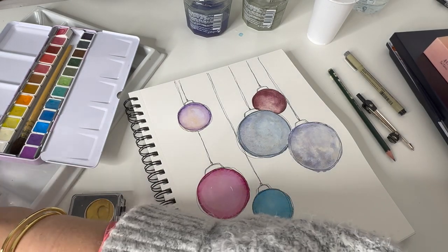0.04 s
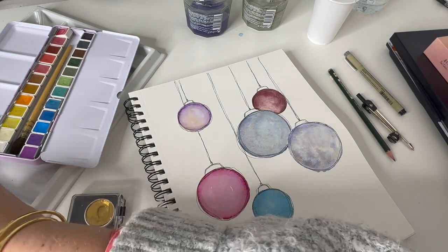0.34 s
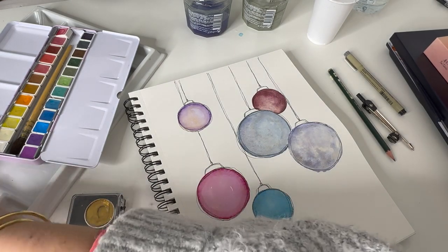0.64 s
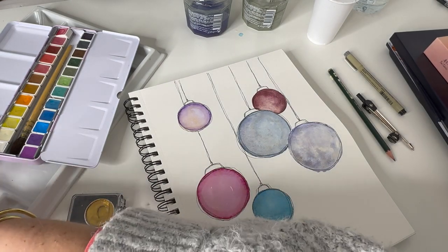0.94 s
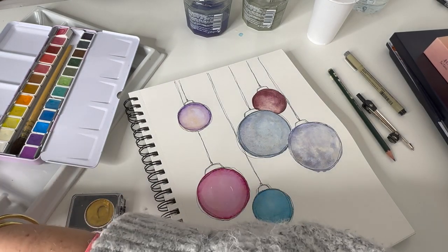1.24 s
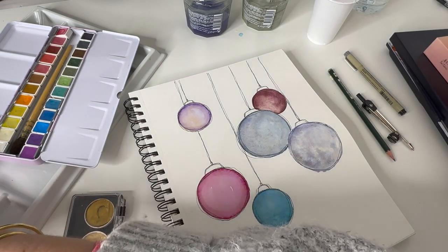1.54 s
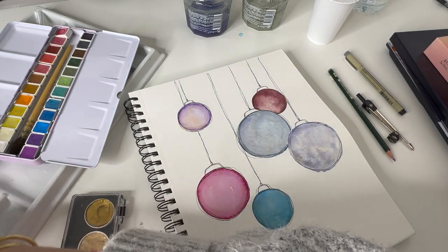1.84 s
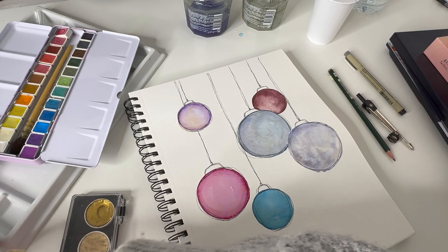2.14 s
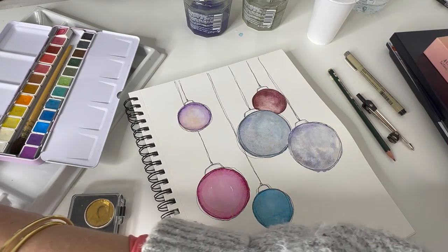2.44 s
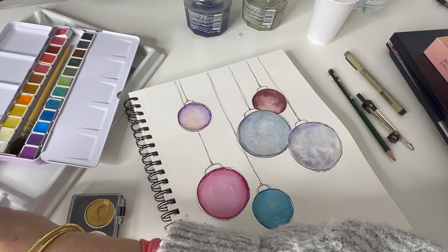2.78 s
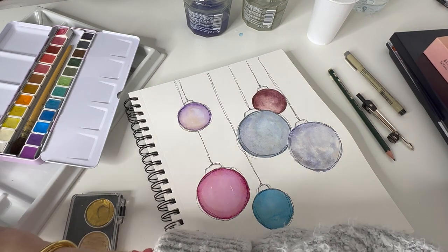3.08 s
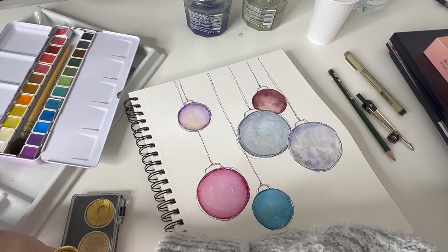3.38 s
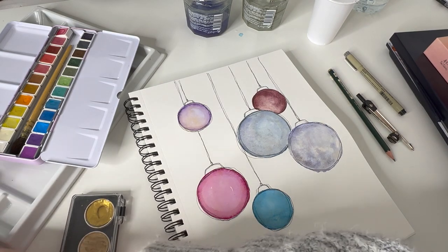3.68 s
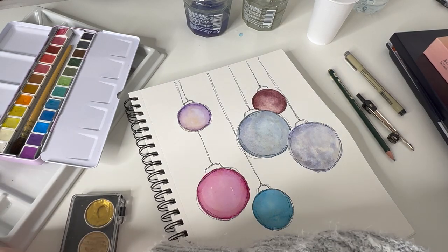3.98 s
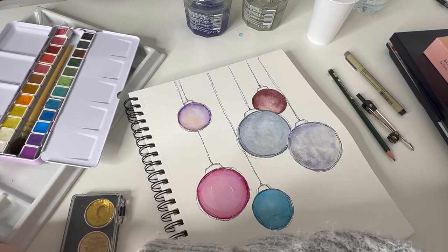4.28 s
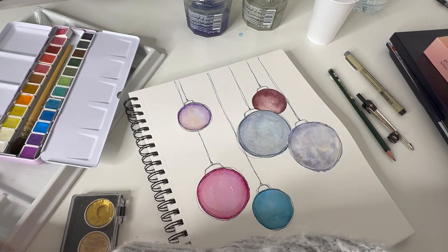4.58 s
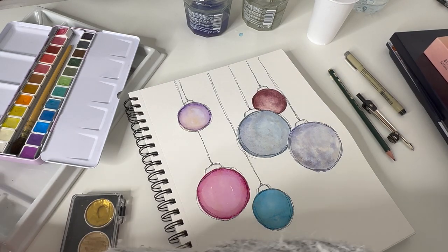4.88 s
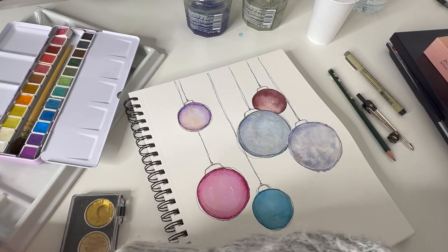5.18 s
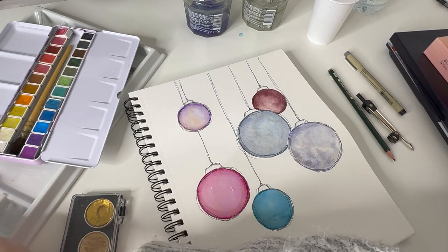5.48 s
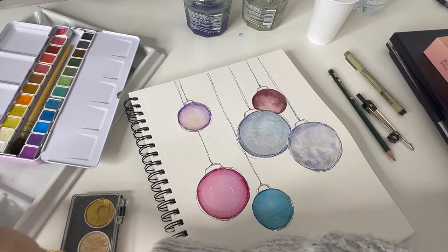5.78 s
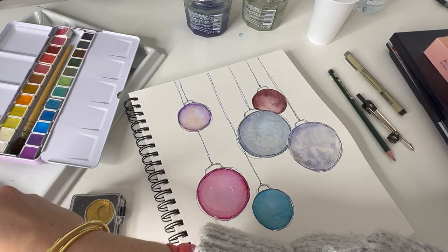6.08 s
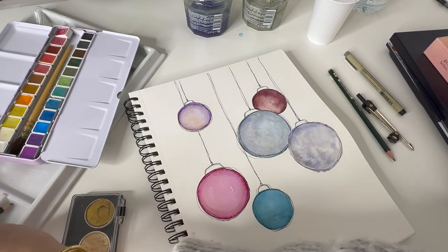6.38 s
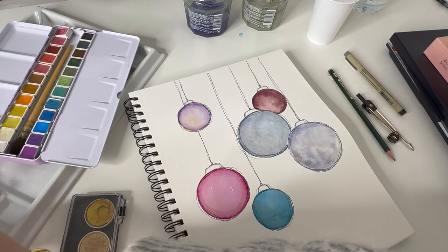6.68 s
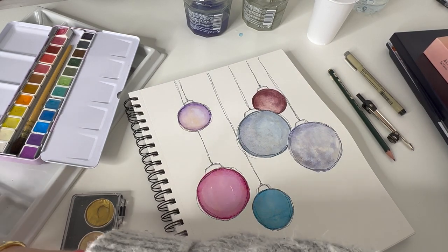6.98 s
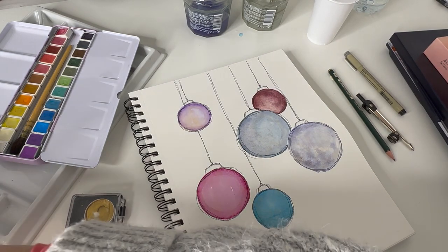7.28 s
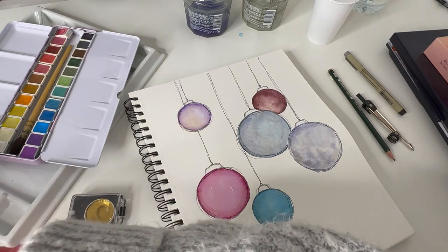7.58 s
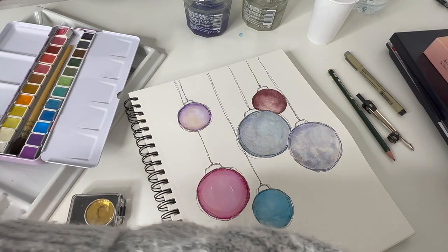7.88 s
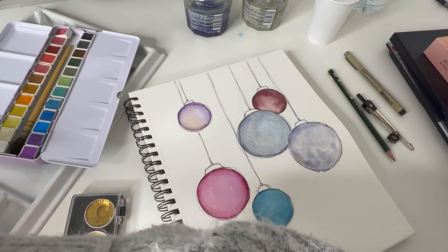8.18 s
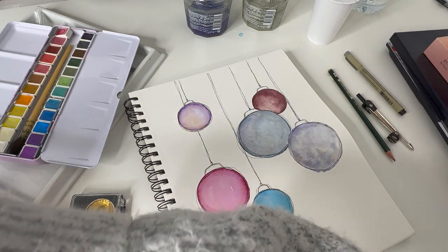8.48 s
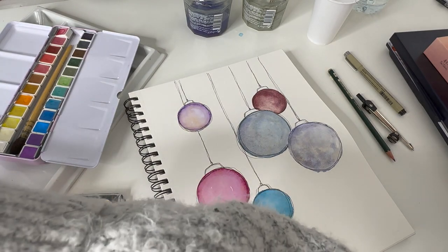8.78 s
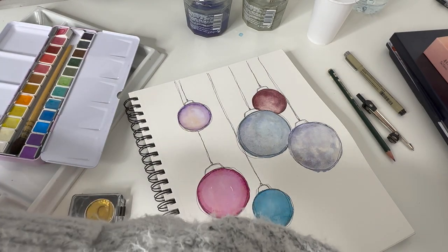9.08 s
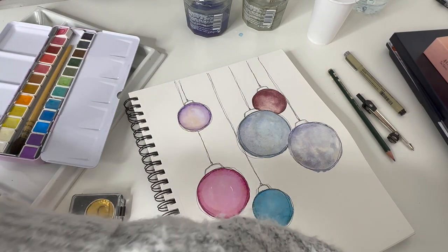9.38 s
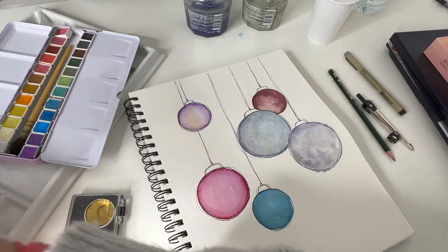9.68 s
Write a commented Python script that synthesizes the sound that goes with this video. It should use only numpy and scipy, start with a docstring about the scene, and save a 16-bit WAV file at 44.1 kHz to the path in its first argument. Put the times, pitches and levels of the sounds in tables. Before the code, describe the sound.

Light, uneven clatter of pens and brushes being shoved around a tray comes from left of the microphone, with a short slide of a box and dull bumps on the desk. After about six seconds, a wool sleeve takes over much closer, rustling in repeated strokes with dry crackles and quick bangle clicks. The room is small and still, apart from a low motor hum.

```python
"""A small quiet room, where someone sorts through painting things at a desk.
Brushes and pens knock, rattle and scrape in a tray off to the left, a box slides aside, the desk thuds.
Then a knitted sleeve sweeps close past the microphone: the wool rubs, its fibres catch and crackle,
and bangles click as they touch. An appliance motor hums underneath."""
import sys
import numpy as np
from scipy import signal
from scipy.fft import rfft, irfft, next_fast_len
from scipy.io import wavfile

SR = 44100
rng = np.random.default_rng(int(sys.argv[2]) if len(sys.argv) > 2 else 0)


def wav_out(sig):
    """Save sig, one row per channel (or a flat mono array), as 16-bit PCM at SR to the path in sys.argv[1]."""
    wavfile.write(sys.argv[1], SR, np.round(np.clip(np.atleast_2d(sig).T, -1, 1) * 32767).astype(np.int16))


N = 433944
TIME = np.arange(N) / SR
CUTOFF_HZ = 16100   # the microphone's upper limit
REBOUND_S, REBOUND_LOSS_DB = 0.009, 9   # typical gap between bounces, and the loss with each


def from_db(db):
    """Turn decibels into a gain to multiply by."""
    return np.exp(np.asarray(db) * np.log(10) / 20)


def rms_one(x):
    """Scale a signal so that its average level (rms) is 1."""
    return x / np.sqrt(np.mean(x ** 2) + 1e-20)


def at_hz(points, hz):
    """Read between the rows of a table, on a logarithmic frequency scale."""
    f, value = np.transpose(points)
    return np.interp(np.log(hz + 1), np.log(f), value)


def butter(x, hz, kind):
    """A gentle filter that keeps the lows, the highs or one band."""
    return signal.sosfilt(signal.butter(2, hz, kind, fs=SR, output="sos"), x + 1e-18)


def convolve(x, response):
    """Let every sample of a signal set off a copy of the response."""
    return signal.oaconvolve(x, response)[:len(x)]


def colour(x, points, size=4096):
    """Shape the tone from rows of frequency in Hz and level in dB; white noise keeps its power."""
    log_gain = np.log(from_db(at_hz(points, np.fft.rfftfreq(size, 1 / SR))))
    cepstrum = irfft(log_gain)
    cepstrum[1:size // 2] *= 2   # folded so that the filter rings only after a hit
    cepstrum[size // 2:] = 0
    response = irfft(np.exp(rfft(cepstrum)))
    return convolve(x, response / np.linalg.norm(response))


def drift(rate, size=16):
    """A smooth random wobble, about 1 in size, that finds a new value `rate` times a second."""
    knots = rng.standard_normal(int(TIME[-1] * rate) + 2)
    step, part = np.divmod(TIME[::size] * rate, 1)
    eased = step + np.sin(part * np.pi / 2) ** 2
    return np.repeat(np.interp(eased, np.arange(len(knots)), knots), size)[:N]


def add(track, s, sound):
    """Mix a short sound into a track at s seconds."""
    start = max(round(s * SR), 0)
    track[start:start + len(sound)] += sound[:N - start]


def grains(per_s, spread_db, clump_db, clump_rate):
    """Rubbing surfaces move in tiny slips of uneven size that come in clumps."""
    sizes = from_db(spread_db * np.minimum(rng.exponential(1, N), 5)) * rng.standard_normal(N)
    slipping = rng.random(N) < per_s / SR
    return rms_one(sizes * slipping * from_db(clump_db * drift(clump_rate)))


def contact(snap_s, chatter_s, chatter_db, size=3000):
    """A hard touch: a brief snap, then a dying chatter of small bounces."""
    t = TIME[:size]
    snap = rng.standard_normal(size) * t * np.exp(-t / snap_s)
    chatter = rng.standard_normal(size) ** 3 * np.exp(-t / chatter_s) * (1 - np.exp(-t / snap_s))
    touch = snap / np.linalg.norm(snap) + from_db(chatter_db) * chatter / np.linalg.norm(chatter)
    return touch / np.linalg.norm(touch)


def ticks(per_s):
    """Now and then something catches and lets go with a tiny tick."""
    catches = grains(per_s, spread_db=2, clump_db=2, clump_rate=10)
    return convolve(catches, contact(snap_s=.0005, chatter_s=.004, chatter_db=-10))


def push(start_s, length_s, attack_s, sag_db_per_s, stop_db_per_s):
    """The strength of one push: it builds up, sags while it lasts, then dies away."""
    t = np.maximum(TIME - start_s, 0)
    lost_db = sag_db_per_s * np.minimum(t, length_s) + stop_db_per_s * np.maximum(t - length_s, 0)
    return np.minimum(t / attack_s, 1) * from_db(-np.minimum(lost_db, 200))


def room_response(build_s=0.00032, size=22050):
    """The room's echoes build up quickly and die away, the high ones first."""
    # Each row: frequency in Hz, seconds to fade by 60 dB.
    fade_times = [(100, 0.48), (500, 0.3), (2500, 0.24), (6000, 0.21), (15000, 0.022)]
    t, edges = TIME[:size], np.geomspace(60, 18000, 10)
    tail = np.zeros(size)
    for low, high in zip(edges, edges[1:]):
        fade = 1000. ** (-t / at_hz(fade_times, np.sqrt(low * high)))
        tail += butter(rng.standard_normal(size), [low, high], "band") * fade
    tail *= 1 - np.exp(-t / build_s)
    return tail / np.linalg.norm(tail)


def place(x, lead_ms, pan_db, room_db, moves_per_s=6):
    """Sound from the left reaches the left side first and louder; its echoes shift as things move."""
    delayed = np.roll(x, round(lead_ms * SR / 1000))
    direct = np.array([x * from_db(pan_db / 2), delayed * from_db(-pan_db / 2)])
    turn = drift(moves_per_s)
    spots = x * np.cos(turn), x * np.sin(turn)
    room = [sum(convolve(spot, room_response()) for spot in spots) for side in range(2)]
    return direct + from_db(room_db) * np.array(room)


def background(air_db, apart_db):
    """An appliance hums over soft room noise; its two lowest motor tones are so close that they throb."""
    # The motor's tones. Each row: pitch in Hz, level in dB.
    tones = [(52.2, -67), (56.5, -57), (193, -69.5)]
    # The room's noise. Each row: frequency in Hz, relative level in dB.
    air_colour = [(25, -35), (66, -3), (100, -15), (132, -10), (195, -17), (600, -34), (1940, -42),
                  (2350, -38), (2760, -46), (8400, -58), (16000, -62)]
    hum = np.zeros(N)
    for hz, db in tones:
        level = from_db(db + 2 * drift(7.7)) * np.sqrt(2)
        hum += level * np.sin(2 * np.pi * hz * TIME + .5 * drift(2.5))
    air = colour(rng.standard_normal(N), air_colour)
    scale = from_db(air_db) / np.std(butter(air, 51, "high"))
    # A second noise, added on the left and taken away on the right, makes the air sound wide.
    apart = from_db(apart_db) * butter(colour(rng.standard_normal(N), air_colour), 210, "high")
    return (hum + scale * air) * from_db([[-1], [.8]]) + scale * apart * [[1], [-1]]


def desk(level_db, fade_s, thud_db, size=8000):
    """A soft bump makes the desk top ring with one low tone and a hollow thud around it."""
    # Each row: start in seconds, relative level in dB, pitch in Hz.
    bumps = [(0.156, -45, 421), (0.759, -37.5, 477), (2.017, -38.5, 153), (2.28, -37, 463),
             (2.296, -28.5, 142), (4.894, -35.5, 364), (4.955, -29.5, 350), (4.961, -34, 134),
             (4.983, -33, 65), (6.208, -35, 450), (6.792, -32, 492), (6.855, -37.5, 402), (7.028, -37, 353),
             (7.626, -34.5, 127), (7.644, -32.5, 290), (7.666, -38, 74.5), (8.404, -37, 341),
             (9.576, -36, 275), (9.629, -41.5, 141)]
    out, t = np.zeros(N), TIME[:size]
    envelope = 1000. ** (-t / fade_s) * (1 - np.exp(-t / 0.00038))
    for s, db, hz in bumps:
        thud = rms_one(butter(rng.standard_normal(size), [.55 * hz, 1.57 * hz], "band"))
        tone = np.sin(2 * np.pi * hz * t)
        add(out, s, from_db(db + level_db) * envelope * (tone + from_db(thud_db) * thud))
    return out


def slide():
    """A box slides over the desk with smooth, fine friction, first lightly, then firmly."""
    # Each row: start in seconds, length in seconds, level in dB.
    slides = [(1.453, 0.057, -51), (1.71, 0.15, -45.5)]
    # The friction's tone. Each row: frequency in Hz, relative level in dB.
    slide_colour = [(100, -33), (400, -5), (690, -3), (860, -7.5), (1250, 5), (2500, -5), (4500, -12),
                    (9000, -22.5), (16000, -26)]
    speed = sum(from_db(db) * push(s, length_s, attack_s=0.088, sag_db_per_s=0, stop_db_per_s=339)
                for s, length_s, db in slides)
    return speed * colour(rng.standard_normal(N), slide_colour)


def pings(fade_s, size=16000):
    """A bangle or pen barrel swings free and rings with a thin, clean tone."""
    # Each row: start in seconds, level in dB, pitch in Hz.
    tones = [(0.227, -60.5, 5970), (0.227, -60, 3520), (4.051, -32, 5650), (4.052, -34, 2000),
             (4.071, -37, 4080), (4.644, -60.5, 4700)]
    out, t = np.zeros(N), TIME[:size]
    fade = 1000. ** (-t / fade_s)
    for s, db, hz in tones:
        add(out, s, from_db(db) * fade * np.sin(2 * np.pi * hz * t))
    return out


def ringing(force, wander_db=6):
    """The tray rings low and the bangles high, in a mix that changes as the point of touch wanders."""
    # Each row: pitch in Hz, width of the band in Hz, relative level in dB.
    resonances = [(480, 420, -6), (1120, 390, -6.5), (2000, 400, -6), (3213, 250, -1.5), (3670, 830, 1),
                  (5650, 370, 12), (5950, 390, 16.5), (8540, 760, 6.5)]
    out = np.zeros(N)
    for hz, width, db in resonances:
        drive = force * from_db(db + wander_db * drift(18))
        out += butter(drive, [hz - width / 2, hz + width / 2], "band")
    return out


def rattle(count=4, size=6000):
    """A loose thing lands and bounces at uneven gaps, each touch weaker and unlike the last."""
    out, s = np.zeros(size), 0
    for k in range(count):
        touch = contact(snap_s=0.00069, chatter_s=0.0054, chatter_db=-9)
        start = min(int(s * SR), size - len(touch))
        out[start:start + len(touch)] += from_db(-REBOUND_LOSS_DB * k) * touch
        s += REBOUND_S * rng.uniform(.5, 2)
    return out / np.linalg.norm(out)


def shoving():
    """A hand shoves things along the tray; each shove sets how freely they ring until the next."""
    # Each row: start in seconds, length in seconds, scraping force in dB, freedom to ring in dB.
    shoves = [(0.0, 0.2, -64, -25), (0.388, 0.23, -60.5, -31), (0.743, 0.21, -44, -16.5),
              (1.365, 0.058, -53, -17), (1.419, 0.03, -43, -19.5), (2.105, 0.16, -51, -19),
              (2.238, 0.18, -46, -17.5), (2.76, 0.088, -54.5, -22), (3.6, 0.055, -54.5, -19.5),
              (4.053, 0.025, -51, -11.5), (4.524, 0.58, -67.5, -24), (4.878, 0.26, -51.5, -23),
              (5.619, 0.059, -50.5, -21), (5.947, 0.48, -50.5, -26), (6.11, 0.1, -46, -19.5)]
    pressure, freedom_db = np.zeros(N), np.zeros(N)
    for s, length_s, db, ring_db in shoves:
        shove = push(s, length_s, attack_s=0.0043, sag_db_per_s=11, stop_db_per_s=173.5)
        pressure = np.maximum(pressure, from_db(db) * shove)
        freedom_db[TIME >= s] = ring_db
    return pressure, freedom_db


def tray(knock_db, scrape_db, ring_db, soft_onset_db):
    """Brushes and pens knock and scrape in the tray; heavy ones add bass, hard ones add treble."""
    # Each row: start in seconds, strength in dB, then bass and treble in dB relative to that strength.
    hits = [(0.4018, -52, 16, 3), (0.47, -39, -0.5, -21), (0.548, -35, 2, -10), (0.755, -30.5, -13, 11.5),
            (0.77, -20.5, -25, 11.5), (0.787, -26.5, -22, 10), (0.8361, -27.5, -18, 12.5),
            (0.853, -27, -15, 13.5), (0.863, -21.5, -21, 9), (0.903, -26, -11, -1),
            (0.9702, -25.5, -11.5, 0.5), (1.0705, -30, -14, 0.5), (1.163, -46.5, 8, 3.5),
            (1.4162, -28.5, -0.5, 17.5), (2.1631, -52.5, 25, 27), (2.245, -15, -8, -1),
            (2.279, -23, 3.5, 16.5), (2.3954, -27, -7.5, 5), (2.597, -47, 14.5, 3.5),
            (2.847, -38.5, -1.5, 12.5), (3.3153, -35, 1.5, 4), (3.5944, -39.5, 4, 3),
            (3.681, -34, 0.5, 12.5), (4.0518, -24.5, -8.5, 3), (4.068, -27, -9.5, 1),
            (4.525, -52.5, 21.5, -14), (4.7957, -54, 10.5, 8), (4.8898, -28, -14.5, 16),
            (4.955, -27, -14.5, 7), (4.98, -27, -10, 6), (5.0725, -21.5, -5.5, -3.5),
            (5.635, -28, -21, 13.5), (5.769, -51, 11, -2), (6.1597, -28, 0, -9), (6.21, -25.5, -6, 0.5),
            (6.234, -23.5, -10, -15), (6.3981, -29, -2.5, 4.5)]
    # The tone of knocks and of scraping. Each row: frequency in Hz, relative level in dB.
    knock_colour = [(60, -13.5), (135, -21.5), (230, 7), (450, 12.5), (1100, 4.5), (2000, 1), (5000, -7),
                    (9000, -12), (13000, -12), (16000, -52.5)]
    scrape_colour = [(60, 3), (140, 12.5), (240, 5.5), (450, 13), (800, 5), (2000, 2.5), (6000, -11),
                     (11000, -13), (16000, -15)]
    blows = np.zeros(N)
    for s, strength_db, bass_db, treble_db in hits:
        touch = rattle()
        bass = from_db(bass_db) * butter(touch, 1300, "low")
        middle = butter(touch, [1300, 7000], "band")
        treble = from_db(treble_db) * butter(touch, 7600, "high")
        blow = from_db(strength_db + knock_db) * (bass - middle + treble)
        add(blows, s, blow)
        # A faint early copy softens each knock's onset.
        add(blows, s - REBOUND_S, from_db(soft_onset_db) * blow)
    knocks = colour(blows, knock_colour)
    slips = .5 * grains(per_s=2500, spread_db=4.0, clump_db=2, clump_rate=120) + ticks(per_s=200)
    pressure, freedom_db = shoving()
    scrape = colour(slips * pressure * from_db(scrape_db), scrape_colour)
    jostle = pressure / (pressure + from_db(-66.5))   # a light scrape hardly shakes anything
    return knocks + scrape + ringing(from_db(ring_db + freedom_db) * (knocks + jostle * scrape))


def clicks(level_db, ring_db, rebound_db):
    """Bangles and plastic cases click; hand and cuff damp them at once, leaving one broad, short ring."""
    # Each row: start in seconds, strength in dB, rough pitch in Hz (low taps are also duller).
    taps = [(1.0405, -44, 9000), (2.5174, -30.5, 4900), (2.7907, -34, 4750), (3.026, -57.5, 5500),
            (3.268, -36.5, 2260), (3.3065, -41.5, 5650), (3.3835, -40.5, 2030), (3.767, -29.5, 3200),
            (4.0914, -30.5, 2000), (4.14, -37.5, 2340), (4.6731, -43.5, 544), (4.918, -34, 7950),
            (5.025, -32, 7740), (6.1186, -34, 1480), (6.3047, -28, 1610), (6.3544, -24.5, 1670),
            (6.504, -28.5, 3400), (6.521, -33.5, 5600), (6.545, -27.5, 1930), (6.935, -33.5, 1590),
            (7.0375, -26.5, 4940), (7.1018, -28.5, 4000), (7.2378, -24, 6100), (7.409, -31, 2130),
            (7.4557, -19.5, 7950), (7.518, -25.5, 5700), (7.5973, -29, 6000), (7.6532, -22.5, 4630),
            (7.8049, -28.5, 5050), (7.9469, -41, 975), (8.0235, -36.5, 506), (8.0803, -41, 1910),
            (8.1294, -36.5, 4240), (8.216, -35.5, 4240), (8.2506, -27, 5170), (8.309, -31, 6240),
            (8.4357, -23.5, 4500), (8.558, -37, 1070), (8.6362, -40.5, 1280), (8.8994, -23.5, 5500),
            (8.9172, -21, 3870), (9.0014, -31, 6100), (9.0852, -20.5, 4300), (9.2846, -24.5, 5270),
            (9.413, -29.5, 8500), (9.527, -28.5, 4900)]
    # The tone of the snap. Each row: frequency in Hz, relative level in dB.
    click_colour = [(70, -15.5), (250, 12), (1500, 7.5), (4000, 5.5), (9000, 7.5), (13000, 5), (16000, -13)]
    snaps, rings = np.zeros((2, N))
    for s, db, hz in taps:
        touch = from_db(db + level_db) * contact(snap_s=0.00066, chatter_s=0.0054, chatter_db=rebound_db)
        resonance = butter(touch, [0.64 * hz, 1.205 * hz], "band")
        add(snaps, s, butter(touch, min(2.7 * hz, CUTOFF_HZ), "low"))
        add(rings, s, resonance * np.linalg.norm(touch) / np.linalg.norm(resonance))
    return colour(snaps, click_colour) + from_db(ring_db) * rings


def stroking(range_db=18.5, fibre_steepness=1.32):
    """Rubbing swells and fades by range_db as the arm speeds up and slows; crackle does so more steeply."""
    # Each row: fastest moment, rise time and fall time in seconds, then rubbing and crackle in dB.
    strokes = [(6.22, 0.18, 0.24, -54.5, -60.5), (6.519, 0.084, 0.13, -49.5, -52.5),
               (6.811, 0.12, 0.12, -46, -47.5), (7.05, 0.12, 0.22, -41.5, -41),
               (7.157, 0.043, 0.045, -57, -36.5), (7.27, 0.49, 0.63, -52.5, -70),
               (7.439, 0.12, 0.23, -45.5, -35), (7.649, 0.12, 0.11, -43.5, -38.5),
               (7.822, 0.23, 0.049, -51, -41), (7.951, 0.31, 1, -64, -73.5), (8.267, 0.1, 0.19, -48, -49),
               (8.428, 0.26, 0.087, -49, -46), (8.78, 0.47, 0.6, -57.5, -59),
               (8.924, 0.18, 0.2, -45.5, -43), (9.289, 0.05, 0.068, -45.5, -42),
               (9.458, 0.11, 0.19, -49, -43.5)]
    rub_db = fibre_db = np.full(N, -np.inf)
    for s, rise_s, fall_s, rub, fibre in strokes:
        speed_db = -range_db * np.maximum((s - TIME) / rise_s, (TIME - s) / fall_s)
        rub_db = np.maximum(rub_db, rub + speed_db)
        fibre_db = np.maximum(fibre_db, fibre + fibre_steepness * speed_db)
    return from_db(rub_db), from_db(fibre_db)


def crackles(snags, count=7):
    """Each snagged fibre lets go with a dry snap of its own brightness."""
    edges = np.geomspace(700, 15500, count + 1)
    band = rng.integers(0, count, N)
    return rms_one(sum(butter(snags * (band == k), edges[k:k + 2], "band") for k in range(count)))


def sleeve(rub_db, jingle_db):
    """Wool drags over paper in small dull jerks; fibres catch, let go and stir the bangles."""
    # The tone of rubbing and of crackle. Each row: frequency in Hz, relative level in dB.
    rub_colour = [(50, -23), (130, -8.5), (200, -13.5), (380, -4), (750, -9.5), (1300, -11), (3000, -22),
                  (8000, -74)]
    fibre_colour = [(300, 8.5), (1500, -2), (4000, 2.5), (6000, 3.5), (9000, -3), (13000, -2.5),
                    (16000, -19)]
    rub_gain, crackle_gain = stroking()
    jerks = grains(per_s=2500, spread_db=2, clump_db=3, clump_rate=35) + ticks(per_s=70)
    drag = colour(rms_one(jerks), rub_colour)
    snags = grains(per_s=2200, spread_db=3.2, clump_db=4, clump_rate=70)
    snaps = crackles(snags) + .6 * ticks(per_s=110)
    fibres = crackle_gain * colour(snaps, fibre_colour)
    return from_db(rub_db) * rub_gain * drag + fibres + from_db(jingle_db) * ringing(fibres)


def scene():
    """The tray lies farther off and carries more echo; the arm is close and carries less."""
    far = tray(knock_db=12.5, scrape_db=-2.5, ring_db=10.5, soft_onset_db=-21.5)
    far = far + slide() + pings(fade_s=0.034)
    return (place(far, lead_ms=.41, pan_db=8.5, room_db=1.5)
            + place(clicks(level_db=14.5, ring_db=-3.5, rebound_db=-7), lead_ms=.43, pan_db=7, room_db=-3)
            + place(sleeve(rub_db=3, jingle_db=-19), lead_ms=.43, pan_db=6.5, room_db=-1)
            + place(desk(level_db=-0.5, fade_s=0.091, thud_db=-1.5), lead_ms=.3, pan_db=2, room_db=-11.5)
            + background(air_db=-62, apart_db=0.5))


def record(dry):
    """The stereo microphone cuts rumble and the very top; each side favours different frequencies."""
    # Each row: frequency in Hz, how much louder the left is than the right in dB.
    balance = [(100, -1.3), (200, -3), (380, -5.5), (700, -1.5), (1290, 2), (2380, -1.5), (4400, -5.5),
               (8120, -2), (15000, -5.5)]
    mid, side = butter(np.array([dry[0] + dry[1], dry[0] - dry[1]]) / 2, 25, "high")
    # Wider in the low middle, narrower in the bass.
    side = side + from_db(-3.5) * butter(side, [450, 1200], "band") - 0.21 * butter(side, 200, "low")
    size = next_fast_len(N + 4096)
    spectrum = rfft(np.array([mid + side, mid - side]), size)
    lean_db = at_hz(balance, np.fft.rfftfreq(size, 1 / SR)) / 2
    heard = irfft(spectrum * from_db([lean_db, -lean_db]), size)[:, :N]
    return signal.sosfilt(signal.cheby1(14, .2, CUTOFF_HZ, fs=SR, output="sos"), heard)


dry = scene()
out = record(dry)
wav_out(out)
```